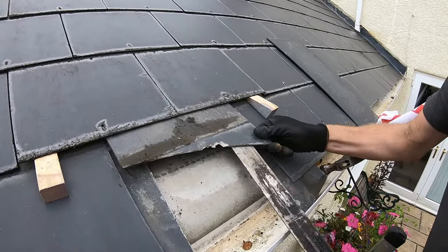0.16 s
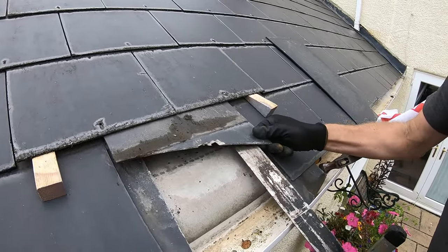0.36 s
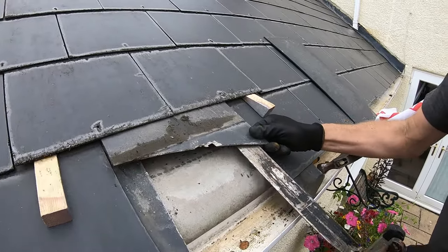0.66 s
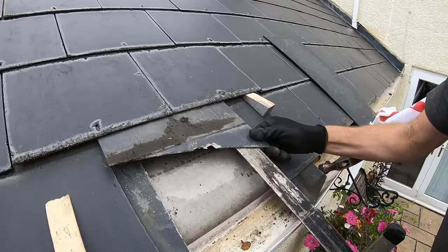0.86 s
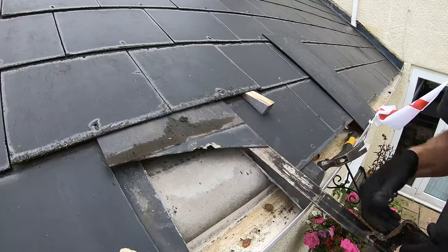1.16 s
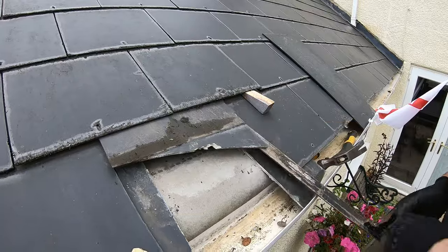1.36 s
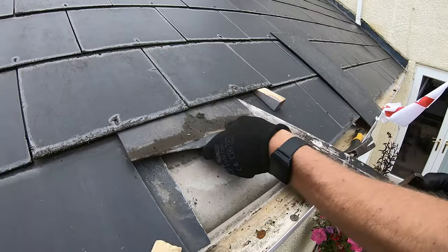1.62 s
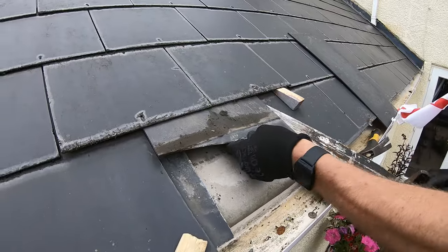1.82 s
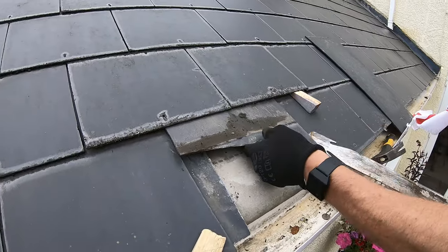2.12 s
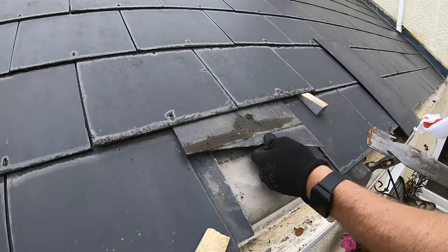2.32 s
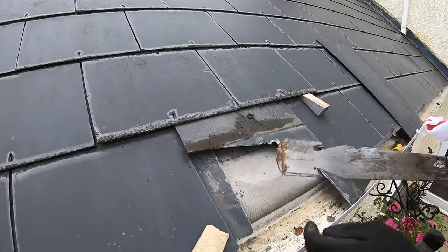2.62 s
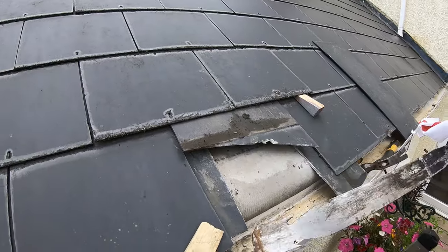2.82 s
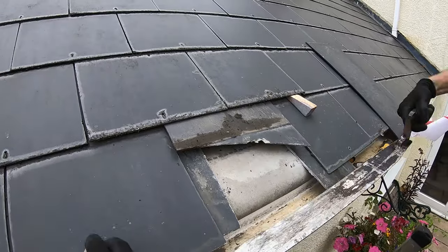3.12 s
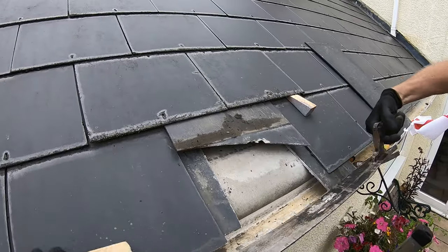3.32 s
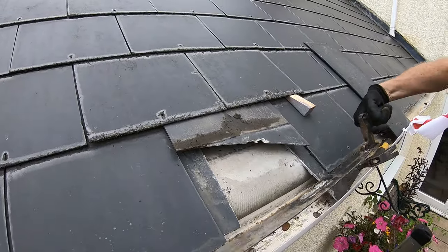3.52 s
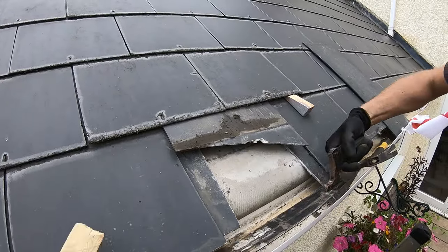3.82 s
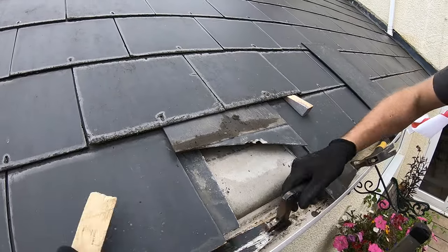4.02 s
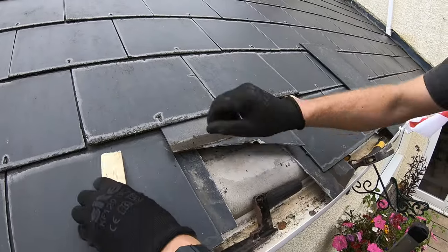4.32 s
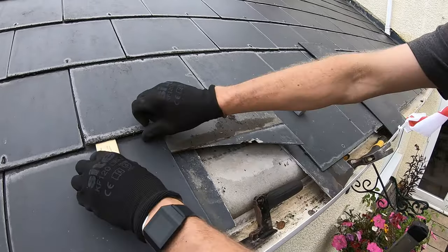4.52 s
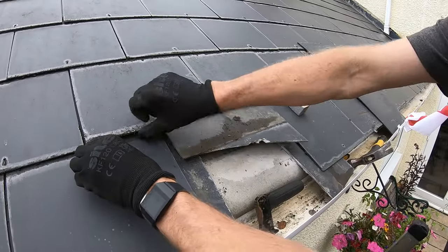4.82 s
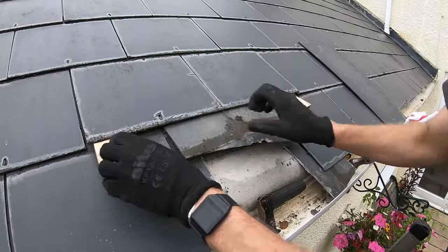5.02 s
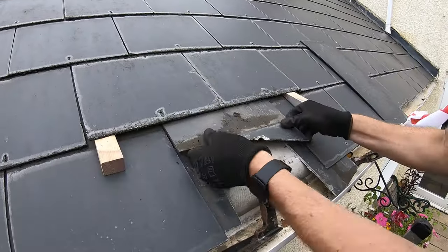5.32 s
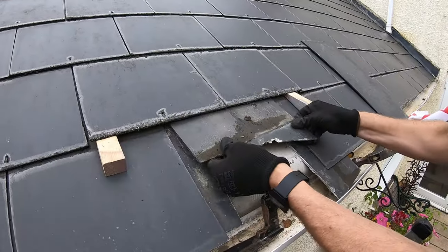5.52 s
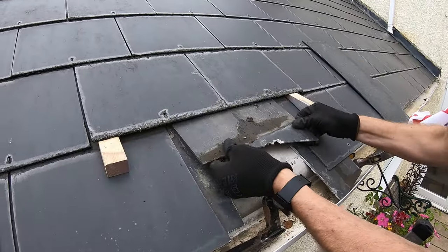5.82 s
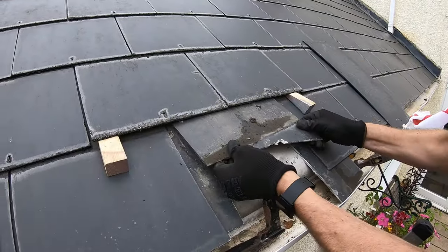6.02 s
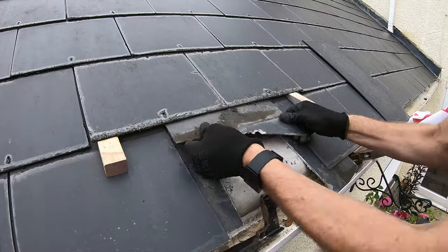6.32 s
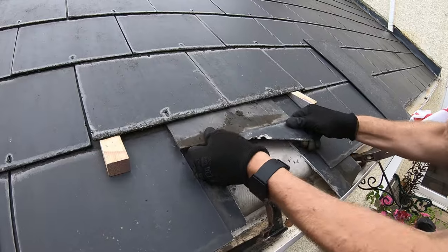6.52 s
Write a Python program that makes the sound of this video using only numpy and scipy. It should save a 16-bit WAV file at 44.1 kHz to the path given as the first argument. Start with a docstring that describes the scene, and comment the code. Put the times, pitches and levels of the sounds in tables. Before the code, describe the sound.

Close, irregular clacks and gritty scrapes of slate being worked loose, mixed with ringing clinks of a metal tool outdoors.

```python
"""Hand work on a slate roof

Up on the roof, a mono camera microphone close to the hands. Slates and a wooden wedge knock, click and
grate on each other, shaking the hollow roof and its timbers. A long steel bar rings in its modes when
struck and scrapes when dragged. Light wind rocks the microphone; the street hums faintly, far off."""
import sys
import numpy as np
from scipy import signal
from scipy.fft import rfft, irfft, next_fast_len
from scipy.io import wavfile
from scipy.ndimage import uniform_filter1d, map_coordinates

SR = 44100
rng = np.random.default_rng(int(sys.argv[2]) if len(sys.argv) > 2 else 0)


def to_wav(s):
    """Save 16-bit WAV."""
    ch = np.atleast_2d(s).T  # columns
    pcm = np.round(np.clip(ch, -1, 1) * 32767)  # PCM
    wavfile.write(sys.argv[1], SR, pcm.astype(np.int16))


N = 293706


def amp(db):
    return 10 ** (np.asarray(db) / 20)


def unit(x):
    return x / np.sqrt(np.mean(x ** 2) + 1e-20)


def along(points, hz):
    """Interpolate (hz, value) points on a log axis."""
    point_hz, values = np.transpose(points)
    return np.interp(np.log(hz + .1), np.log(point_hz + .1), values)


def curves(rows):
    """One value per sample for each column after the time."""
    time_s, *columns = np.transpose(rows)
    return [np.interp(np.arange(N) / SR, time_s, column) for column in columns]


def wobble(rate, count=N):
    """A smooth random curve, rate knots a second."""
    knots = rng.standard_normal(int(count * rate / SR) + 4)
    return map_coordinates(knots, [np.arange(count) * rate / SR])


def filtered(x, response):
    """Pass x through a frequency response."""
    size = next_fast_len(N + SR // 2)
    return irfft(rfft(x, size) * response(np.fft.rfftfreq(size, 1 / SR)), size)[..., :N]


def coloured(x, spectrum):
    """x shaped by a spectrum, rms 1."""
    return unit(filtered(x, lambda hz: amp(along(spectrum, hz))))


def resonate(x, modes, direct):
    """A body's broad resonances beside a direct path."""
    return filtered(x, lambda f: direct + sum(
        (-1) ** k * amp(db) * 1j * f * width / (hz * hz - f * f + 1j * f * width)
        for k, (hz, width, db) in enumerate(modes)))


def band(x, lo_hz, hi_hz):
    return signal.sosfilt(signal.butter(2, [lo_hz, hi_hz], "bandpass", fs=SR, output="sos"), x)


def strokes(rows):
    """Gain of each layer: a stroke swells 20 dB per rise time, holds, and dies 20 dB per fall time."""
    t, power = np.arange(0, N / SR + .002, .001), 0
    for start_s, hold_s, rise_s, fall_s, db, *relative_db in rows:
        before = np.maximum(start_s - t, 0) / max(rise_s, .005)
        after = np.maximum(t - start_s - hold_s, 0) / max(fall_s, .005)
        layer_db = db + np.array([0, *relative_db])[:, None]
        power = power + amp(layer_db - 20 * (before + after)) ** 2
    return np.array([np.interp(np.arange(N) / SR, t, np.sqrt(layer)) for layer in power])


# Resonances of a loose slate, and of the battens and void below: centre_hz, width_hz, gain_db
SLATE_MODES = [(1560, 1500, -12), (2650, 390, 5.5), (5570, 110, -16.5), (5870, 49, -4.5), (7100, 140, -7.5)]
ROOF_MODES = [(212.6, 1200, -10), (403, 230, -13.5), (717, 45, -10)]
# Treble of snaps and rubbing: frequency_hz, density_db
HISS_SPECTRUM = [(2940, -26.5), (5000, -5.5), (5840, -2), (6440, -2.5), (7200, -4.5), (8250, -4),
                 (9650, -16.5), (13100, -15), (16000, -16.5)]
# Contacts near the microphone: start_s, level_db, knock_relative_db, pitch_hz, snap_relative_db, decay_s
KNOCKS = [(.013, 6, -20.5, 1187, -19.5, 0.034), (0.029, -4.5, -23, 675, -14, 0.028),
          (.175, -12.5, -14, 460, -19.5, 0.052), (0.369, 3, -25, 875, -9.5, 0.052),
          (.487, -33, -0.5, 365, -31, 0.022), (.558, 5, -18, 860, -21.5, 0.039),
          (.626, -42.5, -12, 650, 8.5, 0.023), (.736, -10.5, -5.5, 468, -8, 0.06),
          (.789, -24.5, 9.5, 935, -20, 0.036), (.957, -9.5, -3.5, 618, -22, 0.035),
          (1.087, -28.5, -8, 369, -3.5, .035), (1.135, -5, -13.5, 873, -20, 0.024),
          (1.166, -19.5, -6.5, 1140, -17, 0.021), (1.19, -13.5, -10.5, 580, -20, 0.022),
          (1.222, -15, -4, 1070, -17, 0.012), (1.262, -27, -3, 1060, -16, 0.031),
          (1.281, -2.5, -21, 1330, -35.5, 0.051), (1.447, -15, -19, 880, -48, 0.038),
          (1.463, -6.5, -15, 486, -49, 0.035), (1.526, -12.5, -24, 840, -33, 0.057),
          (1.747, -14.5, -2.5, 417, -29, 0.049), (1.82, -7, -16, 361, -39, 0.049),
          (1.887, -14, -18.5, 470, -5.5, 0.063), (1.935, -16.5, -7.5, 766, -24, 0.088),
          (2.024, 0.5, -18, 810, -12, 0.063), (2.112, -17, -27, 354, -14.5, 0.028),
          (2.842, -37, -5, 710, -23, 0.075), (2.893, -36.5, 4, 710, -18, 0.06),
          (2.975, -10.5, -5.5, 858, -18, 0.049), (3.176, -4.5, -9, 826, -19.5, 0.027),
          (3.279, -27, -16, 487, -16.5, 0.05), (3.328, -28.5, 3, 528, -33, 0.016),
          (3.357, -26, -6, 580, -42, 0.018), (3.535, -25, 3.5, 496, -16, 0.04),
          (3.683, -36, -5, 458, -2.5, 0.096), (3.734, -36.5, 3.5, 476, -11, 0.033),
          (3.837, -26, 2, 490, -14.5, 0.066), (3.925, -19.5, -8.5, 945, -10, 0.063),
          (4.076, -25.5, 6, 556, -32, 0.045), (4.129, -32, 4, 660, -20, 0.088),
          (4.226, -23, 4.5, 570, -10, 0.043), (4.289, -25.5, 3.5, 460, -31.5, 0.063),
          (4.396, -27.5, 4, 680, -7, 0.029), (4.415, -24, -2.5, 494, -3, 0.025),
          (5.133, -33.5, -24, 435, -8, 0.12), (5.327, -18.5, -11, 770, -6.5, 0.035),
          (5.355, -19.5, -22, 415, -35, 0.025), (5.367, -28.5, 4, 2020, -29, 0.021),
          (5.417, -20, -16, 850, -9, 0.028), (5.447, -23, -5.5, 730, -26, 0.037),
          (5.501, -14.5, -15, 646, -31, 0.036), (5.546, -29, 10, 585, -34, 0.021),
          (5.56, -41.5, 10.5, 598, -30, 0.032), (5.878, -31, -16, 1048, -14, 0.15),
          (5.918, -19.5, -1, 895, -11, 0.021), (6.048, -43.5, -19, 410, -2.5, 0.062),
          (6.276, -9.5, -6.5, 530, -17, 0.038), (6.312, -22.5, 11, 488, -27, 0.03),
          (6.334, -7, -0.5, 950, -35, 0.015), (6.353, -14, -14, 1870, -21, 0.038),
          (6.379, -13, -0.5, 354, -11.5, 0.016), (6.401, -19.5, 10, 955, -33, 0.017),
          (6.491, -25, -3, 537, -16.5, 0.056), (6.527, -13.5, -8.5, 400, -28, 0.031)]


def knocks():
    """Wood or slate meets slate: a pitched knock and thud, a clack in a noisy crack, and a short snap."""
    t = np.arange(SR // 6) / SR
    tones, thud, crack, snap = np.zeros((4, N + SR))
    for start_s, db, knock_db, pitch_hz, snap_db, decay_s in KNOCKS:
        at = round(start_s * SR)
        span = slice(at, at + len(t))
        age = t / decay_s
        fade_db = -60 * age  # each part stretches this decay by its own factor
        clack = np.sin(2 * np.pi * rng.uniform(1380, 2897) * t)  # a slate edge
        phase = 2 * np.pi * pitch_hz * t
        knock = np.sin(phase) + .32 * np.sin(1.4 * phase)
        tones[span] += amp(db + knock_db - 3 + fade_db / 1.59) * knock
        tones[span] += amp(db - 19.5 + fade_db / 1.1) * clack
        chatter = rng.standard_normal((3, len(t))) * (1 - np.exp(-age / .026))  # soft contacts start softly
        crack[span] += amp(db - 4.5) * chatter[0] * (amp(fade_db) + amp(fade_db / 2.4 - 14))
        thud[span] += amp(db + knock_db + 7.5) * chatter[1] * amp(fade_db / 3.22)
        snap_fade = amp(fade_db / .57) + amp(fade_db / 3.1 - 23.5)
        snap[span] += amp(db + snap_db + 10.5) * chatter[2] * snap_fade
    crack = band(resonate(crack[:N], SLATE_MODES, direct=.58), 940, 4800)
    thud = band(resonate(thud[:N], ROOF_MODES, direct=.68), 110, 1000)
    snap = band(snap[:N], 4500, 16500)
    snap = filtered(snap, lambda hz: amp(.6 * along(HISS_SPECTRUM, np.clip(hz, 5500, 15000))))
    return tones[:N] + crack + thud + snap


# Modes of the steel bar: pitch_hz
BAR_HZ = [1222, 1534, 1820, 1938, 2272, 2665, 2674, 3066, 3413, 3768, 4392, 4525, 4576, 4703, 4960, 5058,
          5305, 5593, 5728, 6102, 6205, 6592, 6697, 6885, 7176, 7418, 7757, 8400, 9071, 11880, 12770, 13650,
          14120, 14695, 15348]
# The same modes: struck_db, free_t60_s, dragged_db
BAR_MODES = [(-8, 1, -25), (-5, 1.2, -14), (-14, .24, -10), (-20, .2, -13), (-9, .4, -12), (-10, .6, -15),
             (-13, .6, -17), (-16, 1.2, -15), (-2, .5, -12), (-1, .35, -22), (-28, .9, -2), (-30, .6, -8),
             (-1, .28, -18), (-8, .8, -11), (-5, .5, -15), (0, .25, -20), (-16, .35, -14), (-2, .2, -20),
             (-10, .22, -7), (-2, .17, -14), (-5, .22, -9), (-7, .26, -11), (-6, .3, -11), (-10, .2, -12),
             (-7, .23, -6), (-13, .24, -20), (-5, .25, -17), (-8, .15, -17), (-13.5, 0.18, -18),
             (-6, 0.075, -12), (-17, .2, -20), (-15, .1, -22), (-18, .25, -22), (-16.5, .1, -20),
             (-14.5, .1, -18)]
# Rings of the struck bar; rows close in time make one clink:
# start_s, level_db, centre_hz, width_octaves, grip_ratio (scales the ring time)
BAR_RINGS = [(0.174, -21, 4425, 0.032, 1.6), (.18, -32.5, 5310, 0.036, 1.8),
             (.371, -27.5, 4000, 1.2, 0.041), (.405, -29, 2270, .1, 0.4), (.415, -23.5, 5850, .03, 0.88),
             (1.136, -37, 7900, 0.2, 0.59), (1.221, -21, 8100, 0.1, 0.33), (1.261, -34, 8000, 0.14, 1.4),
             (1.762, -47.5, 5200, .6, 0.52), (1.902, -38.5, 4960, 1.2, 0.49), (2.024, -6.5, 4500, 2, 0.049),
             (2.112, -46, 4392, .015, 4), (2.114, -45, 4860, .045, 1.3), (2.13, -58, 2750, .3, 8),
             (2.974, -36, 6200, .8, 1), (3.176, -27, 6697, .03, .35), (3.181, -34, 4900, .2, 1.05),
             (3.184, -38, 3300, .6, .75), (3.178, -24, 11900, 0.091, 1.1), (3.435, -55, 6400, 0.42, 0.14),
             (3.534, -51, 1600, .6, 1), (3.54, -53, 3413, .05, 1.6), (3.542, -45, 5290, .05, 1.5),
             (3.683, -51, 4576, .02, 2.2), (3.72, -28, 3000, .11, 2.2), (3.715, -43, 5070, .02, 1.6),
             (3.731, -36, 6800, .14, .9), (3.70, -51, 1450, .5, 2.2), (3.722, -44, 4576, .02, 1.6),
             (3.716, -42, 12700, .3, 1.3), (4.054, -25.5, 12800, 0.33, 1.5), (6.362, -9, 4392, 0.02, 0.34)]


def bar_rings():
    """The struck bar rings: each row sounds the modes around one pitch, for as long as the grip allows."""
    hz = np.array(BAR_HZ)[:, None]
    struck_db, t60_s, _ = np.transpose(BAR_MODES)[:, :, None]
    t, out = np.arange(SR * 3 // 4) / SR, np.zeros(N + SR)
    swing = amp(2.5 * np.array([wobble(12, len(t)) for _ in hz]))  # the swinging bar turns its faces
    onset = 1 - np.exp(-t / .003)  # the ring spreads through the bar
    modes = np.sin(2 * np.pi * hz * t) * swing * onset
    for start_s, db, centre_hz, octaves, grip in BAR_RINGS:
        distance = np.log2(hz / centre_hz) / octaves
        mode_db = db + struck_db - 9 * distance ** 2 + rng.normal(0, .74, hz.shape)
        count = int(len(t) * np.clip(grip, .1, 1))
        envelopes = amp(mode_db - 60 * t[:count] / (t60_s * grip))
        out[round(start_s * SR):][:count] += np.sum(envelopes * modes[:, :count], axis=0)
    return out[:N]


# The bar dragged on its edge: start_s, hold_s, rise_s, fall_s, level_db
BAR_DRAGS = [(1.89, 0.081, 0.093, 0.027, -47), (3.955, 0.061, 0.044, 0.071, -28)]


def bar_drags():
    """Friction feeds all the steel modes with noise while the contact damps them."""
    hz, t = np.array(BAR_HZ)[:, None], np.arange(SR * 3 // 4) / SR
    _, t60_s, dragged_db = np.transpose(BAR_MODES)[:, :, None]
    damped_t60_s = .5 * np.minimum(t60_s, .3)
    rings = amp(dragged_db - 60 * t / damped_t60_s) * np.sin(2 * np.pi * hz * t)
    rings /= np.linalg.norm(rings)
    push = friction(flutter_db=1.2, spike_db=.6, shift_db=1.5) * strokes(BAR_DRAGS)[0]
    # the contact point wanders, so each quarter of the modes comes and goes on its own
    return sum(signal.oaconvolve(push * amp(3 * wobble(25)), rings[k::4].sum(0)) for k in range(4))[:N]


def friction(flutter_db, spike_db, shift_db):
    """Many tiny catches: pressure flutters, some grains stick out, resonances shift with the contact."""
    catches = rng.standard_normal(N)
    catches *= amp(flutter_db * wobble(60) + spike_db * np.clip(wobble(700), 0, 2) ** 2)
    spectra = signal.stft(catches, nperseg=256)[2]
    shift = uniform_filter1d(rng.standard_normal(spectra.shape), size=3, axis=0)  # smooth over pitch
    shift = unit(uniform_filter1d(shift, size=14, axis=1))  # and over time
    return unit(signal.istft(spectra * amp(shift_db * shift), nperseg=256)[1][:N])


# Grit between stone faces: frequency_hz, density_db
GRIT_SPECTRUM = [(530, -11), (900, 7.5), (1120, 3.5), (1810, 1), (4470, -4), (6000, -38), (7800, -81.5),
                 (13200, -120)]
# Rafter rumble against the hollow roof's level: time_s, relative_db
RAFTER_RUMBLE = [(0, 1), (2.15, 4), (2.4, -10.5), (4.8, -14), (5.2, 1.5), (5.8, -3.5), (6.66, -7)]
# Slate, glove and wedge rubbing, close up:
# start_s, hold_s, rise_s, fall_s, grit_db, roof_relative_db, hiss_relative_db
RUBS = [(0.0, 0.025, .02, 0.045, -21, -4, -5), (.12, 0.026, 0.048, 0.075, -54.5, 16, 4.5),
        (.18, 0.0045, 0.044, 0.15, -39.5, 3, -2.5), (.40, 0.0074, 0.063, 0.07, -52.5, 19, 2),
        (.59, 0.0069, 0.066, 0.12, -39.5, 8, -12), (.78, .15, 0.25, 0.18, -39, -2, -0.5),
        (1.1, 0.01, 0.034, 0.39, -43.5, -6.5, 2), (1.35, 0.025, 0.1, 0.087, -33.5, 0.5, -9.5),
        (1.52, 0.042, 0.14, 0.09, -44, 5.5, 0.5), (1.72, 0.035, 0.033, 0.019, -32.5, -18, -0.5),
        (1.88, 0.0039, 0.069, 0.012, -27, -7.5, -3), (1.955, 0.0056, 0.021, 0.043, -32.5, -2, 0.5),
        (2.04, 0.044, 0.017, 0.077, -40.5, 7, -4.5), (2.28, 0.0081, 0.24, 0.4, -67.5, -6.5, -6),
        (2.85, 0.0041, 0.04, 0.067, -50.5, 13, -8), (2.94, 0.004, 0.038, 0.05, -34.5, -0.5, -9),
        (3.1, 0.084, 0.076, 0.027, -41, -4.5, 1), (3.19, 0.019, 0.0061, .1, -39.5, 4.5, -4.5),
        (3.285, .01, 0.033, 0.1, -52.5, 17.5, -11), (3.57, 0.15, 0.28, 0.39, -66, 12, -2),
        (3.78, 0.15, 0.11, .1, -57, -9, -3), (3.94, 0.15, 0.049, 0.1, -45.5, 8.5, 6.5),
        (4.235, 0.012, 0.059, 0.027, -30.5, -8, -5.5), (4.29, 0.16, 0.13, 0.11, -40.5, 4.5, -3.5),
        (4.5, 0.069, 0.14, 0.061, -45.5, 7.5, -6), (4.74, 0.077, 0.044, 0.04, -39.5, -1.5, -10),
        (4.94, 0.011, 0.047, 0.16, -62, 0, -0.5), (5.14, 0.17, 0.033, 0.13, -49.5, -9, -2.5),
        (5.36, 0.013, 0.1, 0.029, -45, 8, -27), (5.46, 0.061, 0.043, 0.041, -40.5, 8.5, -3.5),
        (5.71, .01, 0.17, 0.24, -67.5, -0.5, -2), (5.925, 0.012, 0.037, 0.042, -43.5, 18.5, 0),
        (6.15, 0.013, 0.074, 0.22, -57, -5.5, 0.5), (6.212, 0.047, 0.0093, 0.12, -30.5, -3, -3.5),
        (6.262, 0.021, 0.0097, 0.043, -28, 5.5, -12), (6.34, 0.075, 0.041, 0.061, -39, 11.5, -12),
        (6.53, 0.043, 0.044, 0.055, -33, 0, -7.5)]


def rubbing():
    """Grit between stone faces grates, shakes the hollow roof and hisses."""
    resting_db = [[-77], [-62.5], [-75.5]]  # hands resting between strokes: grit, roof, hiss
    grit_gain, roof_gain, hiss_gain = np.hypot(strokes(RUBS), amp(resting_db))
    catches = friction(flutter_db=2.3, spike_db=1.3, shift_db=3.1)
    shaking = friction(flutter_db=.5, spike_db=2.5, shift_db=4.5)
    roof = unit(band(resonate(shaking, ROOF_MODES, direct=.94), 62, 710))
    rafters = amp(curves(RAFTER_RUMBLE)[0]) * unit(band(rng.standard_normal(N), 34, 220))
    hiss = coloured(catches, HISS_SPECTRUM) + amp(-7) * loose_grit(count=2500)
    return grit_gain * coloured(catches, GRIT_SPECTRUM) + roof_gain * (roof + rafters) + hiss_gain * hiss


def loose_grit(count, t60_s=.013):
    """Loose grains ping briefly, each at its own pitch, a few much louder; rms 1."""
    when, pitch, softness = rng.random((count, 3)).T[:, :, None]
    t, hz = np.arange(SR // 60) / SR, 2000 * 5 ** pitch
    envelope = amp(-60 * t / t60_s) * (1 - np.exp(-t / .0005))
    pings = (softness + .04) ** -.6 * envelope * np.sin(2 * np.pi * hz * t)
    at = (when * N).astype(int) + np.arange(len(t))
    return unit(np.bincount(at.ravel(), pings.ravel(), N + len(t))[:N])


# An edge catching: start_s, hold_s, rise_s, fall_s, level_db, first_hz, last_hz
RASPS = [(0.848, 0.065, .04, .03, -47, 6410, 6400), (0.883, 0.075, .04, .03, -45, 2740, 2500),
         (1.359, 0.049, 0.036, 0.024, -36, 1353, 1430), (3.051, 0.08, .03, .04, -43.5, 4910, 4830),
         (3.089, 0.027, 0.15, 0.039, -44, 8570, 8300), (3.927, 0.13, .01, 0.042, -40, 1680, 2090),
         (4.194, 0.1, 0.026, .04, -48.5, 3830, 4280), (4.204, 0.077, 0.026, 0.037, -53, 6850, 6930),
         (6.21, 0.009, 0.0043, 0.011, -26.5, 9700, 9250)]


def rasps(width_ratio=.24):
    """Uneven slips make a narrow, rough band that slides from its first pitch to its last."""
    out, lead, t = np.zeros(N + SR), SR // 8, np.arange(SR // 2) / SR
    for *stroke, first_hz, last_hz in RASPS:
        start_s, hold_s = stroke[:2]
        at = round(start_s * SR) - lead
        hz = np.interp(t - lead / SR, [0, hold_s], [first_hz, last_hz])
        phase = 2 * np.pi * np.cumsum(hz) / SR
        knots = rng.standard_normal((2, SR // 8))
        slips = [map_coordinates(row, [t * width_ratio * first_hz]) for row in knots]
        rasp = unit(slips[0] * np.sin(phase) + slips[1] * np.cos(phase))
        gain = strokes([stroke])[0][at:][:len(t)]
        out[at:][:len(gain)] += gain * rasp[:len(gain)]
    return out[:N]


# Shoves on the roof timbers: start_s, level_db, pitch_hz
THUMPS = [(.565, -14.5, 130), (.738, -11, 155), (.79, -12.5, 86), (0.961, -15.5, 84), (1.75, -9.5, 130),
          (1.79, -19, 70), (2.035, -26.5, 110), (2.07, -14.5, 80.5), (2.118, -17.5, 100),
          (5.366, -16.5, 128), (5.511, -21, 151)]


def timber_thumps(cycles_per_20_db=1.9):
    """The timbers give under a soft push: a few low cycles swell and die."""
    out, t = np.zeros(N + SR), np.arange(SR // 6) / SR
    for start_s, db, hz in THUMPS:
        cycles = hz * t
        envelope = amp(db - 20 * cycles / cycles_per_20_db) * (1 - np.exp(-cycles / .5))
        out[round(start_s * SR):][:len(t)] += envelope * np.sin(2 * np.pi * cycles)
    return out[:N]


# Wind at the microphone: time_s, sway_db, buffet_db
WIND_LEVELS = [(0.0, -32, -37), (0.2, -52, -33.5), (0.39, -20.5, -34.5), (0.85, -22.5, -38.5),
               (2.0, -27.5, -34), (2.6, -29, -47), (4.0, -25, -39.5), (5.88, -27.5, -45.5),
               (6.66, -31, -27.5)]
# Its slow sway and its buffeting: frequency_hz, density_db
SWAY_SPECTRUM = [(1, -0.5), (3, 14.5), (8, 15), (15, -15.5), (25, -5.5), (40, -64)]
BUFFET_SPECTRUM = [(12, -45), (22, -8), (35, 2), (55, -18), (90, -13.5), (200, -27), (400, -70.5)]


def wind():
    """Light wind rocks and buffets the microphone's diaphragm."""
    sway_db, buffet_db = curves(WIND_LEVELS)
    sway = coloured(rng.standard_normal(N), SWAY_SPECTRUM)
    buffet = unit(amp(2.5 * wobble(9)) * coloured(rng.standard_normal(N), BUFFET_SPECTRUM))
    return amp(sway_db) * sway + amp(buffet_db) * buffet


# The distant street, heard from the roof: frequency_hz, density_db
STREET_SPECTRUM = [(35, -46.5), (60, -26.5), (81, -7.5), (238, -19), (330, -19), (651, -26.5),
                   (2000, -30.5), (2650, -34.5), (2840, -32), (14900, -52), (16000, -73.5)]


def street(level_db=-68.5):
    """Far traffic and air make a faint, wavering floor."""
    return amp(level_db + .8 * wobble(4.3)) * coloured(rng.standard_normal(N), STREET_SPECTRUM)


def scene():
    """One microphone, close to the work, feeds both channels."""
    work = rubbing() + rasps() + knocks() + timber_thumps() + bar_rings() + bar_drags()
    return np.tile(work + wind() + street(), (2, 1))


def record(dry, ceiling=.98, top_hz=15900):
    """The camera flattens peaks softly and cuts off the highest treble."""
    soft = dry / (1 + np.abs(dry / ceiling) ** 8) ** (1 / 8)
    edge_hz = top_hz + np.array([-200, 0, 950, 1080])
    return filtered(soft, lambda hz: amp(np.interp(hz, edge_hz, [0, -18, -22, -200])))


dry = scene()
out = record(dry)
to_wav(out)
```